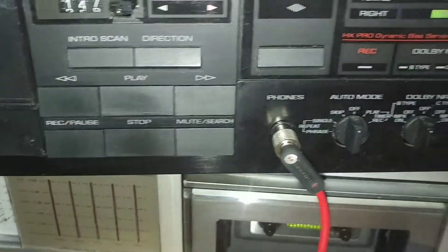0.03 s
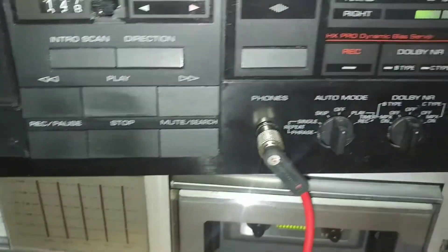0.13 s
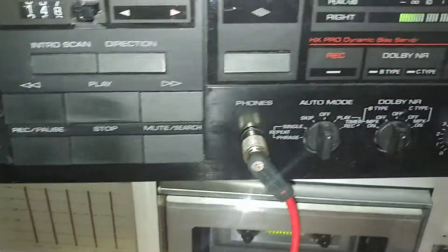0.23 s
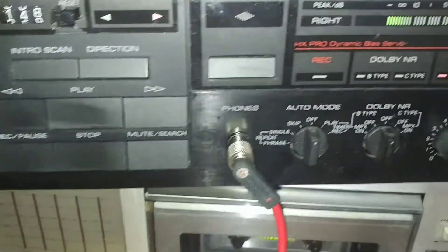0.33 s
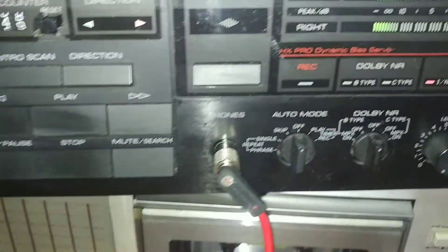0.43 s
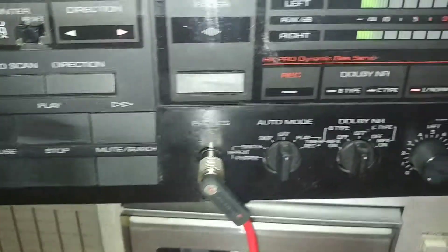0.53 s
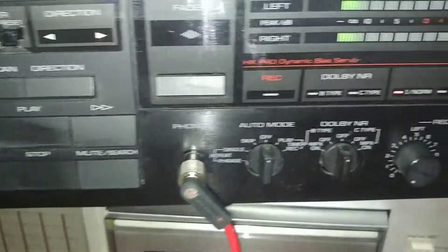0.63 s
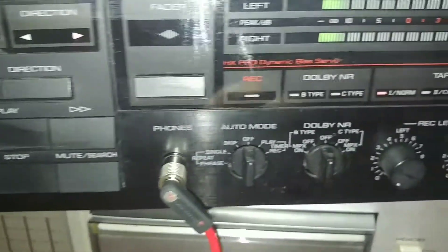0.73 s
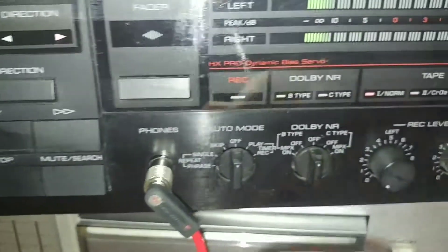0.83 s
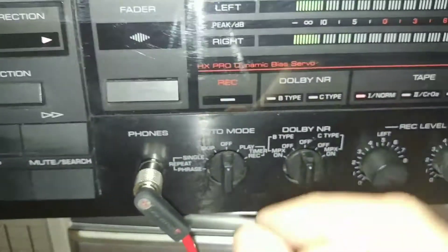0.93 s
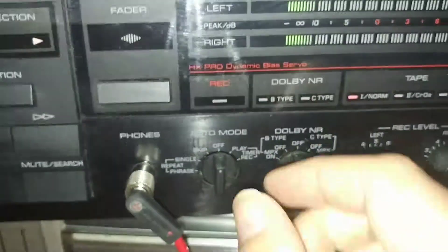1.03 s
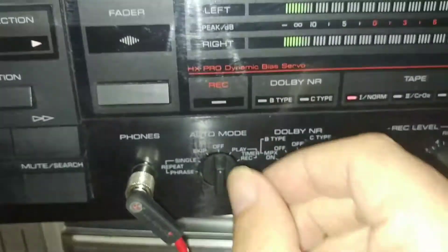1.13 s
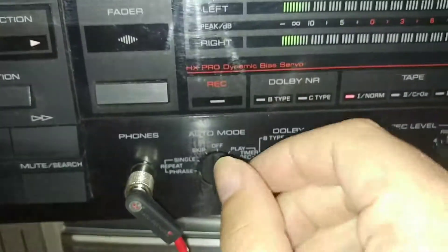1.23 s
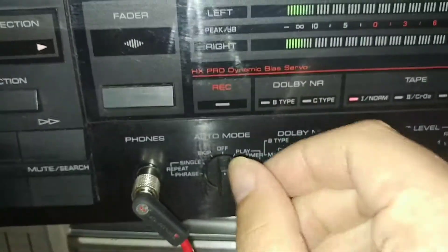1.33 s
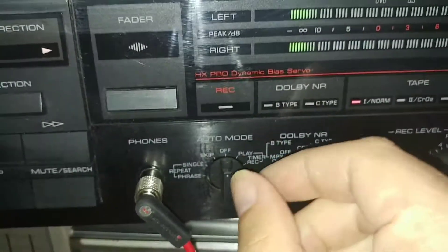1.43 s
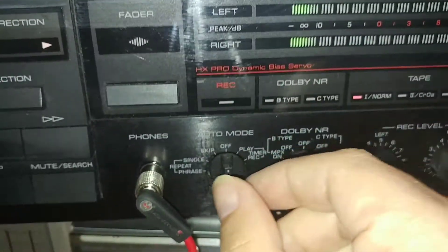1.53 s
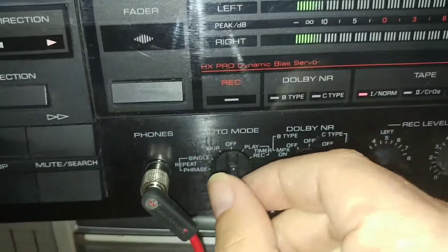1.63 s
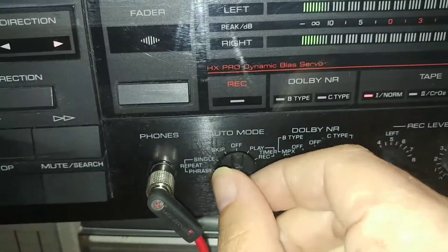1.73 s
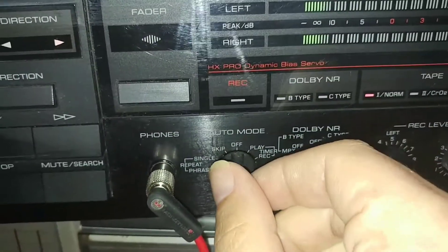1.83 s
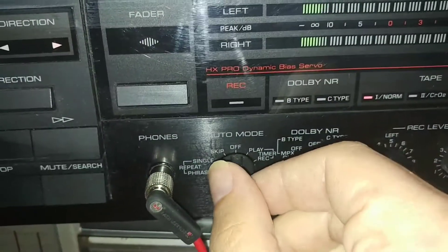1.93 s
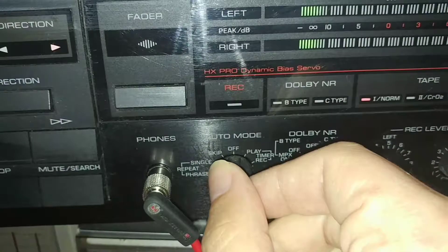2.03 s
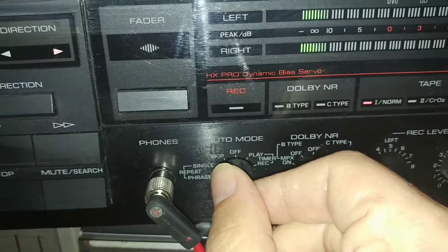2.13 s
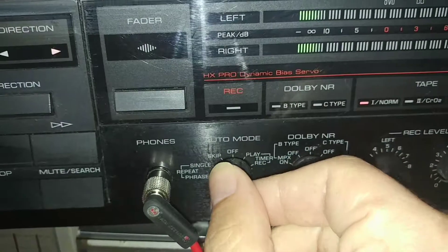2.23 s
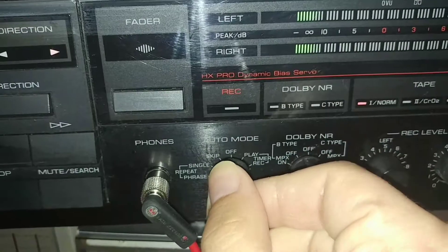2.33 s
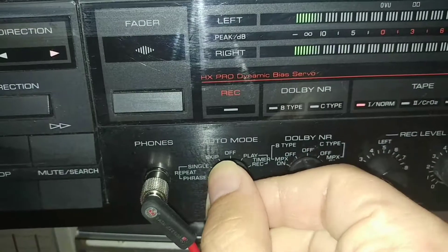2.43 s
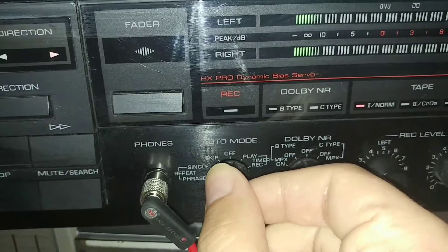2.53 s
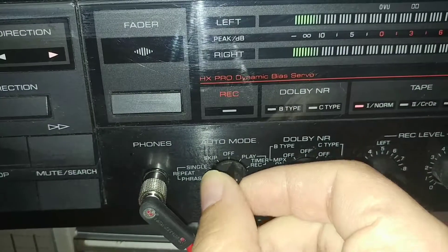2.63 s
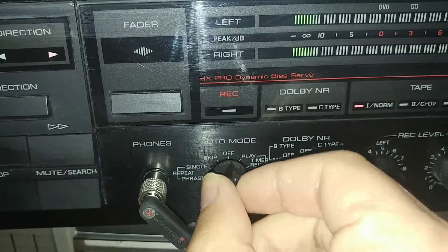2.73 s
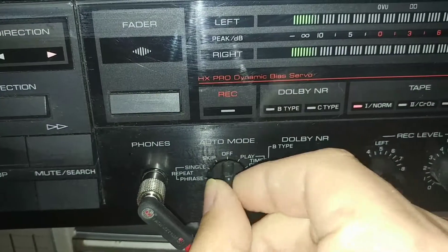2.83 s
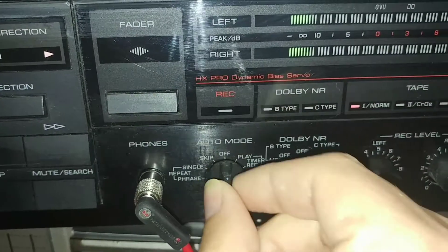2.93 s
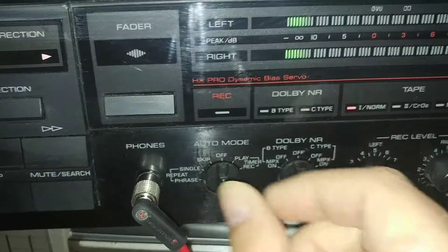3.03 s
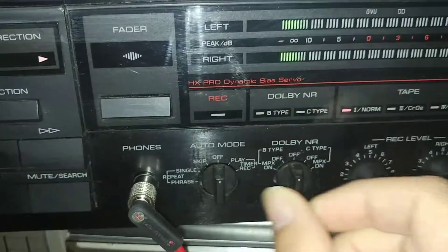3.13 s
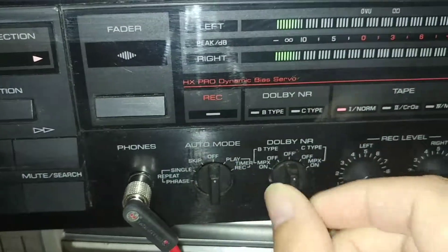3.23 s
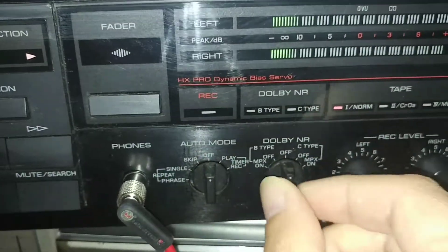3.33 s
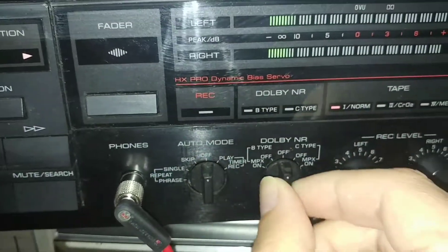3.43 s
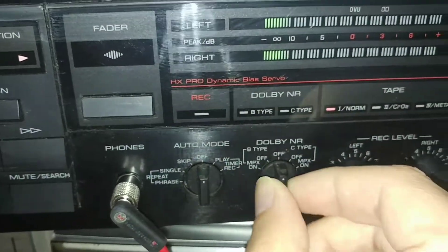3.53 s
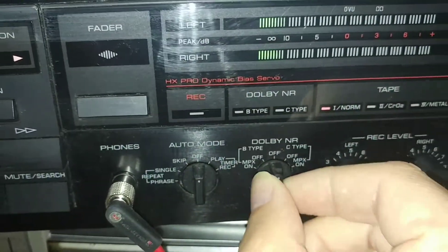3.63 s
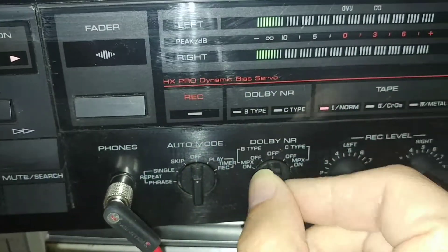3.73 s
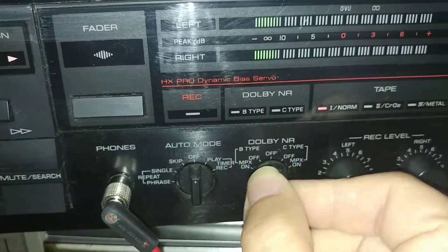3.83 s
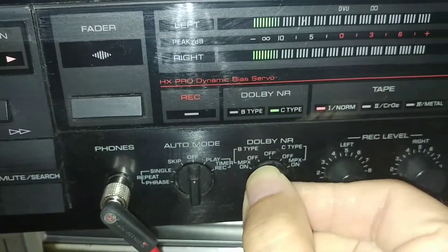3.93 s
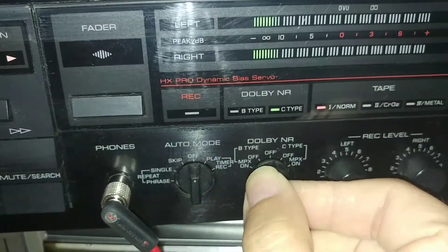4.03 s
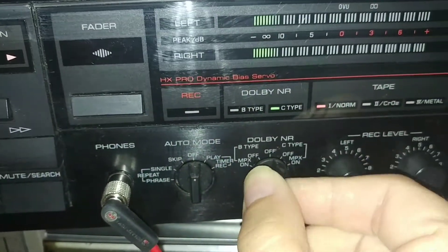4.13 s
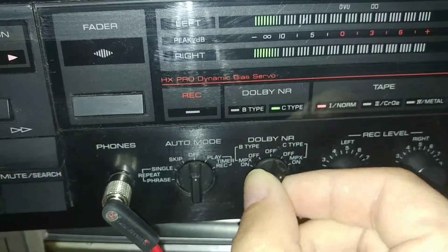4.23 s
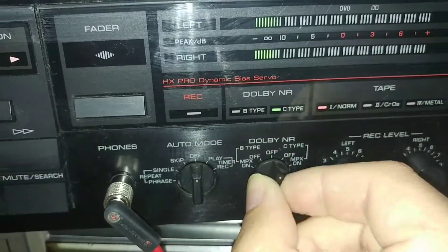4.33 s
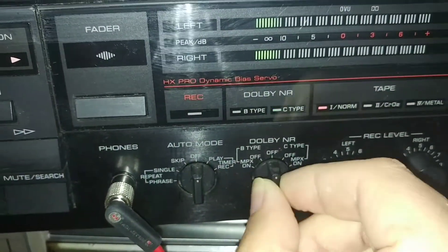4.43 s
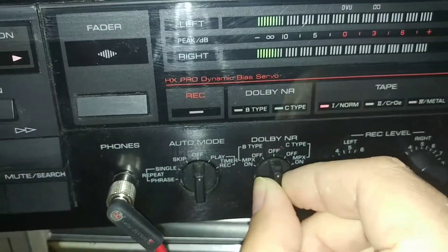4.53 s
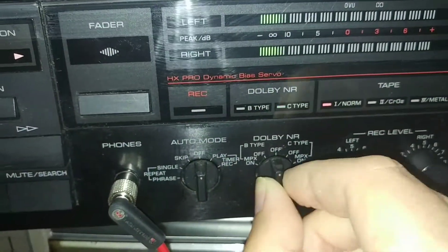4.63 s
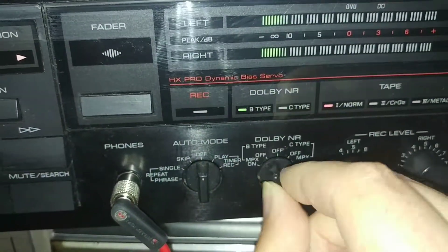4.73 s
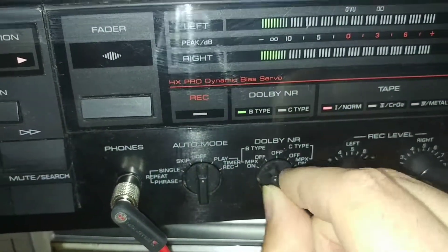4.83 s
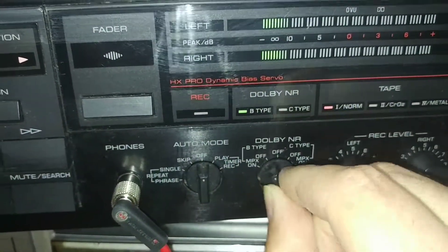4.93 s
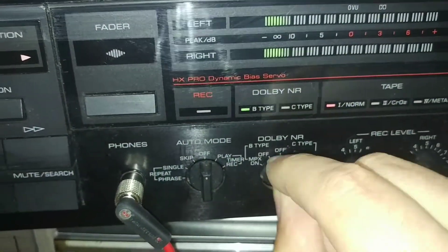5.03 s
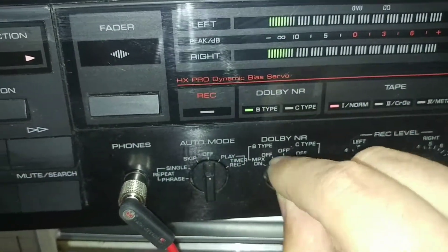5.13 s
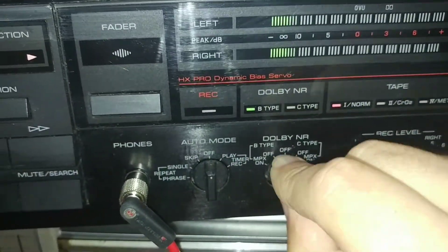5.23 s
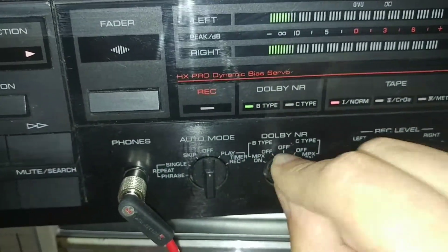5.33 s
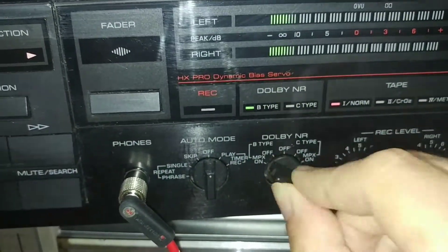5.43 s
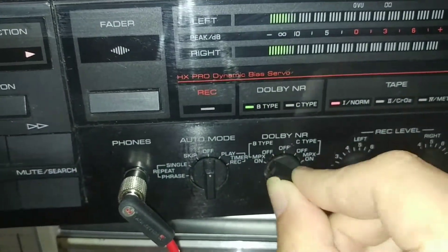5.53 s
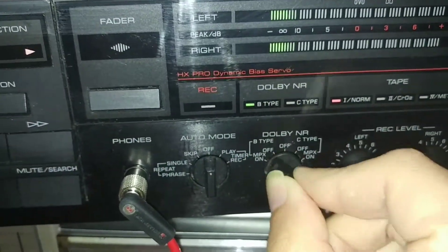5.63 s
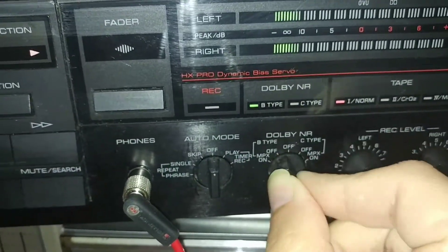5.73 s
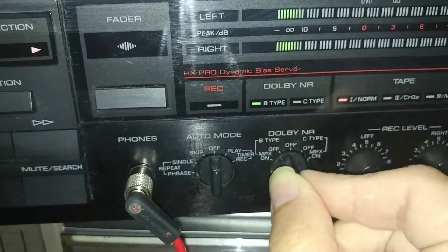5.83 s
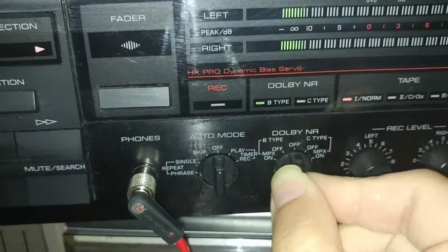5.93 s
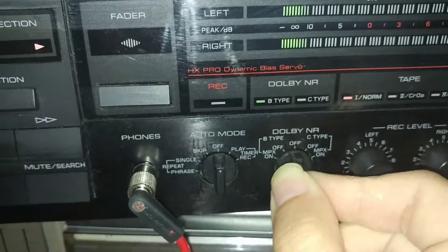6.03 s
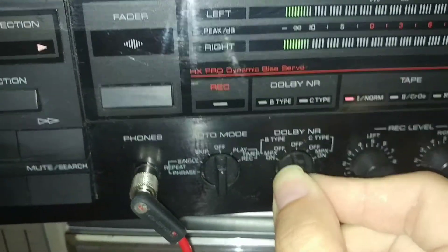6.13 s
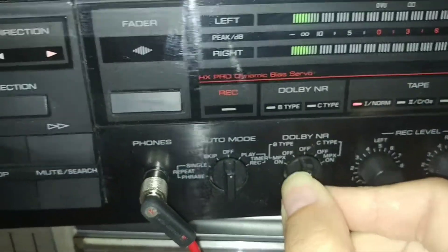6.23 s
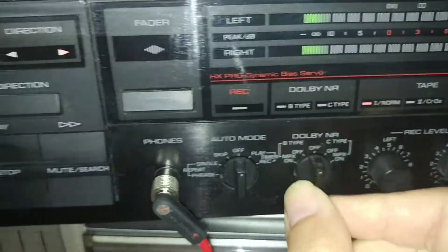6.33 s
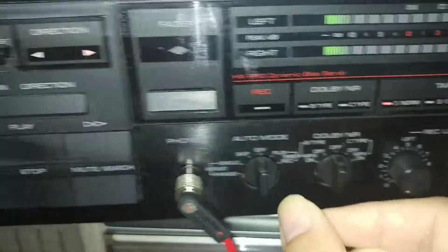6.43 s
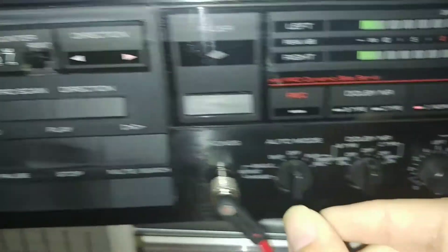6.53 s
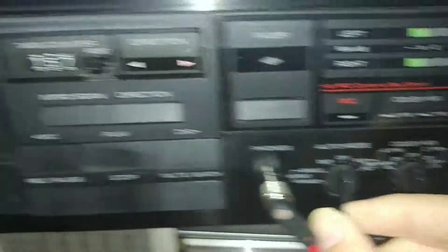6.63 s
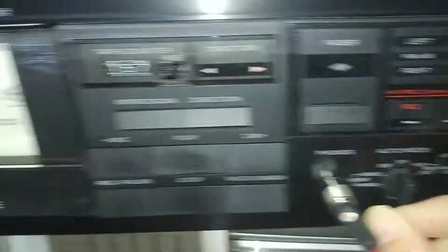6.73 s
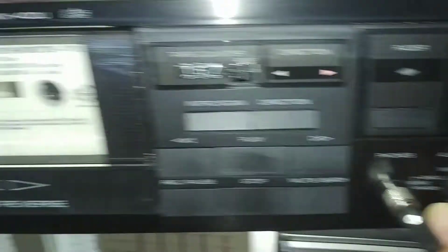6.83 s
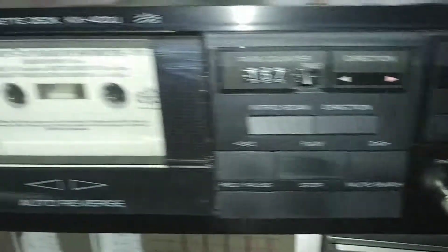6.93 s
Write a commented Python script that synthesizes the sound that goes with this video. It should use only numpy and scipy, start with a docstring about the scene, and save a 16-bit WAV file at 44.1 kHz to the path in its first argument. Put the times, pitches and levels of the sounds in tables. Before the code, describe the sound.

Steady tape motor whir with faint gear ticks, two bursts of loud mechanical clacks, then one booming knock and softer plastic knob clicks

```python
"""A cassette deck plays, very close: its motor whirs and the gears tick until the mechanism clacks to a stop.
The gears spin up again and throw the head carriage over with more clacks, which boom in the cabinet.
Fingers then turn a rotary switch through its detents in a small quiet room, once with a loud clack.
Shaped noise makes the whir, ticks, rubs and blows; dying sines make the modes of cabinet, panel, deck and spring."""
import sys
import numpy as np
from scipy import signal
from scipy.fft import rfft, irfft, next_fast_len
from scipy.io import wavfile
from scipy.ndimage import uniform_filter1d

SR = 44100
rng = np.random.default_rng(int(sys.argv[2]) if len(sys.argv) > 2 else 0)


def file_out(sig):
    """Save sig as 16-bit WAV at sys.argv[1]."""
    # one column per channel
    cols = np.atleast_2d(sig).T
    # limit, then scale
    lim = np.clip(cols, -1, 1)
    pcm = np.round(lim * 32767).astype(np.int16)
    wavfile.write(sys.argv[1], SR, pcm)


N = 308255
TIME = np.arange(N) / SR

# the motor runs twice, to play the tape and to shift the heads: (start s, stop s)
PLAY, SHIFT = (-0.1, 3.42), (3.755, 4.15)

# Colour of the thin hiss. Each row: frequency in Hz, density in dB per Hz.
HISS = [(1500, -3), (4000, -5.5), (6800, 0.5), (8900, -6.5), (10500, 8.5), (13000, -0.5), (15700, 3.5)]
# Modes of the front panel under the switch. Each row: frequency in Hz, level in dB, t60 in s.
PANEL_MODES = [(246, -14.5, 1), (337, 1, 0.35), (538, -15.5, 0.37), (645, -29, 0.75), (846, -7, 0.28),
               (855, -6, 0.087), (1054, -14.5, 0.27), (1370, -1, 0.16), (1464, -5, 0.16),
               (1710, -6.5, 0.071), (1880, -12, 0.25), (1990, -5, 0.093), (2140, -10.5, 0.11)]


def gain_of(db):
    """Decibels to gain."""
    return 10 ** (np.asarray(db) / 20)


def evened(x):
    """Scales to rms 1."""
    return x / np.sqrt(np.mean(x ** 2) + 1e-30)


def read(points, hz):
    """Reads a curve on a log-frequency axis."""
    f, value = np.transpose(points)
    return np.interp(np.log(hz + 1), np.log(f + 1), value)


def level(curve):
    """Gain over time from rows of (s, dB)."""
    return gain_of(np.interp(TIME, *np.transpose(curve)))


def swells(rows):
    """Gain over time from arches of (start s, length s, dB)."""
    total = np.zeros(N)
    for s, length_s, db in rows:
        total += gain_of(db) * np.sin(np.pi * np.clip((TIME - s) / length_s, 0, 1))
    return total


def add(mix, s, sound):
    """Adds a sound to both ports at time s."""
    part = mix[:, max(round(s * SR), 0):][:, :sound.shape[1]]
    part += sound[:, :part.shape[1]]


def complex_noise(*shape):
    """Random complex spectrum."""
    return rng.standard_normal(shape) + 1j * rng.standard_normal(shape)


def noise(colour, size=N, low_hz=20, high_hz=20000):
    """Coloured noise at both ports, partly alike, of joint rms 1."""
    # Likeness of the two ports. Each row: frequency in Hz, share in common from 0 to 1.
    likeness = [(60, 1), (300, 0.98), (700, 0.65), (1500, 0.18), (5000, 0.082), (15000, 0.18)]
    n = next_fast_len(size)
    hz = np.fft.rfftfreq(n, 1 / SR)
    left, other = complex_noise(2, len(hz))
    same = np.clip(read(likeness, hz), 0, 1)
    right = same * left + np.sqrt(1 - same ** 2) * other
    shape = gain_of(read(colour, hz)) * (hz > low_hz) * (hz < high_hz)
    return evened(irfft(np.array([left, right]) * shape, n)[:, :size])


def ragged(colour, depth_db, count=460):
    """Many small parts add close, random peaks to the spectrum above 900 Hz."""
    hz = np.geomspace(40, 17000, count)
    peaks = np.clip(rng.standard_normal(count), -2, 2)
    return np.c_[hz, read(colour, hz) + depth_db * (hz > 900) * peaks]


def drift(rate_hz):
    """Random wander of rms 1, with a Gaussian roll-off at rate_hz."""
    hz = np.fft.rfftfreq(2 * N, 1 / SR)[:4000]
    slow = irfft(complex_noise(len(hz)) * np.exp(-(hz / rate_hz) ** 2))
    return evened(np.interp(TIME, np.linspace(0, 2 * N / SR, len(slow)), slow))


def dying(t, t60):
    """Decay that starts at t = 0."""
    return (t >= 0) * gain_of(-60 * np.maximum(t, 0) / t60)


def mode(hz, t60, t):
    """One dying sine with a soft onset and random phase, alike at both ports."""
    onset = 1 - np.exp(-t / 0.0012)
    return dying(t, t60) * onset * np.sin(2 * np.pi * (hz * t[None] + rng.random()))


def struck(pushes, modes):
    """Sets off a body's modes at each push of (s, dB)."""
    out = np.zeros((2, N))
    for s, force_db in pushes:
        add(out, s, sum(gain_of(force_db + db) * mode(hz, t60, TIME[:SR // 2]) for hz, db, t60 in modes))
    return out


def resonate(x, peaks):
    """Passes a sound through parallel resonances, each twice for dark valleys; rms 1."""
    total = np.zeros_like(x)
    for hz, width_hz, db in peaks:
        section = np.concatenate(signal.iirpeak(hz, hz / width_hz, SR))
        total += gain_of(db) * signal.sosfilt([section] * 2, x)
    return evened(total)


def throb(hz, depth, wander=0.008):
    """Once a turn a rotating part rubs harder."""
    turns = np.cumsum(hz * (1 + wander * drift(5.4))) / SR
    return evened(np.exp(depth * np.cos(2 * np.pi * turns)))


def running(start, stop, spin_up_s=0.0098, coast_t60=0.4):
    """Gain of something that starts quickly, holds and coasts to rest."""
    return np.clip((TIME - start) / spin_up_s, 0, 1) * dying(np.maximum(TIME - stop, 0), coast_t60)


def load(full_s=2.9, build_s=0.5, slack_db=-12):
    """Gain of the parts that sing when the gears bear load: lower while slack, full from full_s."""
    return gain_of(slack_db * np.clip((full_s - TIME) / build_s, 0, 1))


def playing():
    """Gain of the playing motor, with its nearness."""
    # Nearness of the transport. Each row: time in s, gain in dB.
    nearness = [(0, 2), (.7, 0.1), (1.6, -.5), (3.3, 0.5)]
    return running(*PLAY) * level(nearness)


def whir(play, level_db=-56, motor_hz=52.6, flywheel_hz=6.5, shift_db=-10):
    """The motor shakes the transport's resonances, swelling with the flywheel."""
    # Transport resonances. Each row: frequency in Hz, width in Hz, level in dB.
    transport = [(399, 65, -2), (458, 20, -5.5), (806, 63, 0), (850.4, 27, 0.5), (1125, 44, -5.5),
                 (1233, 110, -4), (1458, 50, -8.5), (1653, 63, -9.5), (1948, 410, -19), (2230, 26, -11.5),
                 (2454, 78, -15)]
    shake = noise([(100, 0.00065), (3000, 0)], high_hz=4000)
    shake = shake * throb(motor_hz, depth=0.48) * throb(flywheel_hz, depth=0.24)
    runs = play + gain_of(shift_db) * running(*SHIFT)
    return gain_of(level_db) * resonate(shake, transport) * runs


def whine(play, level_db=-58, whine_hz=394, throb_hz=5.8):
    """A gear whines: a wandering, throbbing sine that grows with load."""
    turns = np.cumsum(whine_hz * (1 + 0.006 * drift(5.56))) / SR
    tone = np.sin(2 * np.pi * turns) * gain_of(0.9 * drift(5)) * throb(throb_hz, depth=0.51)
    return gain_of(level_db) * evened(tone) * play * load()


def tape(play, level_db=-58.5, reel_hz=58.7, shift_db=4.5):
    """Tape slides over the heads: unsteady hiss that throbs with the reel."""
    # Colour of the sliding tape. Each row: frequency in Hz, density in dB per Hz.
    sliding = [(200, 8), (600, 9), (1000, 2), (2300, 2), (3400, -2), (5000, -1.5), (7400, -1.5),
               (8800, -12), (10000, 5.5), (10800, 4.5), (11800, 2), (14000, 4.5), (15700, 4.5)]
    rub = noise(ragged(sliding, depth_db=2.5)) * throb(reel_hz, depth=0.18) * gain_of(2.4 * drift(59))
    return gain_of(level_db) * rub * (play + gain_of(shift_db) * running(*SHIFT))


def motor(hiss_db=-61.5):
    """The running motor: whir of the transport, whine of a gear, tape slide and thin hiss."""
    play = playing()
    return whir(play) + whine(play) + tape(play) + gain_of(hiss_db) * play * noise(HISS)


def room(air_db=-64, hiss_db=-66, hum_spread_db=4):
    """Low room noise, a wavering hum and thin hiss."""
    # Colour of the room noise. Each row: frequency in Hz, density in dB per Hz.
    air = [(18, -58), (30, -37.5), (64, -6.5), (173, -4.5), (206, -10), (240, 2.5), (280, -18),
           (321, -13.5), (510, -14.5), (606, -16.5), (3000, -37.5), (3900, -94), (6600, -120)]
    # Hum partials. Each row: frequency in Hz, level in dB.
    partials = [(75, -72.5), (118, -75), (240, -69)]
    out = gain_of(air_db) * noise(air) + gain_of(hiss_db) * noise(HISS)
    for hz, db in partials:
        tone = np.sin(2 * np.pi * hz * TIME + 1.1 * drift(6))
        out += gain_of(db) * evened(tone * gain_of(hum_spread_db * drift(7.9)))
    return out


def passing_teeth(tooth_hz=29.6, tooth_db=-59.5, spread_db=2.5):
    """Power of the faint, uneven ticks, one for each tooth that passes while playing."""
    passing = np.diff(np.floor(tooth_hz * TIME), prepend=0)
    uneven_db = tooth_db + spread_db * np.clip(rng.standard_normal(N), -2, 2)
    return passing * (running(*PLAY) * gain_of(uneven_db)) ** 2


def rattling_teeth(ring, teeth_per_s=700, spread=0.34, mesh_db=-64):
    """Power of many random catches in a row as the gears spin up and shift the heads."""
    # Bursts of rattling. Each row: start in s, length in s, relative level in dB.
    bursts = [(3.757, 0.05, -47.5), (3.808, 0.031, -43.5), (3.838, .022, -42.5), (3.913, .02, -46.5),
              (4.0, .04, -48.5), (4.085, 0.035, -44)]
    teeth = (rng.random(N) < teeth_per_s / SR) * np.exp(spread * rng.standard_normal(N))
    drive = swells(bursts) ** 2 + (gain_of(mesh_db) * running(*SHIFT)) ** 2
    return teeth / teeth.mean() / ring.sum() * drive


def gear_train(level_db=-56):
    """The spinning train sings through its resonances while the heads shift."""
    # Train resonances. Each row: frequency in Hz, width in Hz, level in dB.
    train = [(552, 18, -1.5), (862, 42, 1.5), (1388, 50, 2), (1894, 150, -4.5)]
    return gain_of(level_db) * running(*SHIFT) * resonate(noise([(100, 0), (5000, 0.0029)]), train)


def gears(t60=0.026, room_t60=0.2, room_db=-18, wheel_db=-12):
    """Catching teeth set off short noise bursts with a room tail, which ring the wheel; the train sings."""
    # Teeth that catch hard. Each row: time in s, relative peak in dB.
    ticks = [(.0498, -41.5), (.227, -49), (.478, -47.5), (.494, -40.5), (1.9835, -45), (2.2208, -44.5),
             (2.389, -47.5), (2.4255, -44.5), (2.4598, -45), (2.562, -46), (2.5951, -45.5), (2.7332, -47),
             (2.908, -45.5), (3.0423, -40.5), (3.0803, -39.5), (3.218, -44.5), (3.2586, -39),
             (3.2764, -31.5), (3.4773, -44), (3.7596, -39), (4.0008, -43), (4.0707, -44), (4.0946, -42.5)]
    # Gear colour. Each row: frequency in Hz, density in dB per Hz.
    colour = [(200, -20.5), (900, -5.5), (1900, -6.5), (3000, -9.5), (4000, -6.5), (4450, -1.5),
              (4900, -10.5), (5800, -4), (7300, 2), (8900, -11), (10700, 9), (11800, -5), (16000, -2.5)]
    # Resonances of a struck gear. Each row: frequency in Hz, width in Hz, level in dB.
    wheel_peaks = [(4435, 210, 2.5), (5810, 380, -8.5), (7400, 540, -15.5)]
    t = np.arange(SR // 4) / SR
    decay = dying(t, t60) ** 2 + (gain_of(room_db) * dying(t, room_t60)) ** 2
    ring = decay * (1 - np.exp(-t / 0.0005))
    catches = passing_teeth()
    for s, db in ticks:
        catches[round(s * SR)] = gain_of(db) ** 2
    catches += rattling_teeth(ring)
    envelope = np.sqrt(abs(signal.fftconvolve(catches, ring)[:N]))  # powers add
    ticking = gain_of(6.0) * envelope * noise(ragged(colour, depth_db=7.5))
    wheel = gain_of(wheel_db) * ticking.std() * resonate(ticking, wheel_peaks) * load()
    return ticking + wheel + gear_train()


def rubs(grip_db=-67, grip_spread_db=2.5):
    """Fingers bump and rub on the panel in soft, dull swells that ring it.

    From 3.5 s on, a faint unsteady rub lies underneath, which dies away after 6.95 s."""
    # Bumps and rubs. Each row: start in s, length in s, relative level in dB.
    bumps = [(1.197, .12, -54), (2.638, 0.22, -53.5), (2.922, .22, -45), (3.198, 0.3, -44.5),
             (3.76, 0.053, -56), (4.466, 0.088, -49.5), (4.512, 0.15, -42.5), (4.89, 0.094, -46.5),
             (5.275, 0.058, -54), (5.59, 0.14, -63.5), (6.26, 0.16, -52.5), (6.765, 0.15, -58)]
    # Colour of a rub. Each row: frequency in Hz, density in dB per Hz.
    colour = [(50, -25), (130, 2.5), (270, -1), (380, -6.5), (560, -0.5), (1000, -18), (2000, -18.5),
              (3500, -32.5), (16000, -32)]
    rub = noise(colour) * gain_of(2.0 * drift(28))
    ringing = resonate(rub, [(hz, 50, db) for hz, db, t60 in PANEL_MODES])  # 50 Hz wide
    grip = gain_of(grip_db + grip_spread_db * drift(6.1)) * running(3.5, 6.95)
    return (swells(bumps) + grip) * (0.67 * rub + 0.36 * ringing)


def clacks():
    """Loud, bright blows of the deck's mechanism and, at 4.718 s, of the switch, booming in the cabinet's modes."""
    # Each row: time in s, chatter in s, relative strength in dB, brightness in dB, extra body knock in dB.
    rows = [(2.4746, 0.002, -47, 6.5, 2.5), (3.2802, .0013, -26.5, 12.5, -8.5),
            (3.2837, 0.0056, -25, 12.5, 4), (3.3027, 0.01, -32.5, 4.5, 1), (3.4824, .0035, -36, 12, -3),
            (4.111, .012, -27.5, 2, -0.5), (4.117, 0.0031, -26.5, 13.5, 2.5), (4.129, .009, -28, 0, 1.5),
            (4.147, 0.0019, -29.5, 17.5, -8), (4.2013, 0.0059, -25.5, 8, 0),
            (4.718, 0.0035, -22.5, 4.5, -0.5)]
    # Metal colour. Each row: frequency in Hz, density in dB per Hz.
    metal = [(50, -18.5), (150, -6.5), (300, 3), (550, -2.5), (900, -1.5), (1400, -3), (2100, -6.5),
             (3300, -13.5), (4700, -12), (7000, -6.5), (8800, -14.5), (10400, 2.5), (12200, -3),
             (16000, -10)]
    # Thud, knock, snap and tick of an even blow, in dB.
    bands_db = (-0.31, 0.32, .3, 0.24)
    # Cabinet modes. Each row: frequency in Hz, level in dB, t60 in s.
    cabinet = [(156.6, -11, 0.64), (254.5, -1.5, 0.39), (307, -15, 0.098), (348.4, -8.5, 0.55),
               (407, -8, 0.28), (436, -19, 0.14), (526, -8, 0.28), (644, -19, 0.13), (702, -14.5, 0.36),
               (878.6, -5.5, 0.24), (1100, -17.5, 0.099), (1125, -11, 0.28), (1227, -7, 0.17),
               (1640, -18, .2), (1813, -7, 0.17), (1990, -28.5, 0.45), (2090, -10, 0.13)]
    out = np.zeros((2, N))
    colour = ragged(metal, depth_db=5.0)
    for row in rows:
        s, sound = blow(row, colour, bands_db, cabinet, modes_db=2.0, shadow_db=0.0)
        add(out, s, gain_of(-3.0) * sound)
    return out


def blow(row, colour, bands_db, modes, modes_db, shadow_db, crack_db=3, crack_t60=0.0013, count=4):
    """Parts meet and chatter: each contact cracks and rings briefly, the room and case for longer."""
    # How thud, knock, snap and tick ring. Each row: low edge in Hz, high edge in Hz, rise in s,
    # contact t60 in s, room level in dB, room t60 in s.
    rings = [(40.7, 450, 0.0079, 0.064, -3, 0.38), (433, 2600, 0.0027, 0.14, -4.5, 0.29),
             (2546, 8800, 0.00078, 0.078, -8.5, 0.26), (9100, 16000, 0.00033, 0.047, -11.5, 0.19)]
    # A harder contact tilts a blow upwards: share of the brightness for thud, knock, snap and tick.
    tilt = (-1.02, -0.29, 0.38, 1)
    s, chatter_s, strength_db, bright_db, body_db = row
    band_db = strength_db + np.array(bands_db) + bright_db * np.array(tilt) + np.array([0, body_db, 0, 0])
    t = np.arange(SR * 3 // 4) / SR
    steps = np.arange(1, count) + rng.uniform(-0.3, 0.3, count - 1)
    contacts = chatter_s * np.r_[0, steps / (count - 1)]
    cracks = sum(gain_of(crack_db) ** 2 * dying(t - c, crack_t60) ** 2 for c in contacts)
    out = np.zeros((2, len(t)))
    for db, (low, high, rise, t60, room_db, room_t60) in zip(band_db, rings):
        near = sum(dying(t - c, t60) ** 2 for c in contacts)
        near = near / near.max() + cracks * (low > 1000)  # only the treble cracks
        near = near * (1 - np.exp(-t / rise)) ** 2
        tail = (gain_of(room_db) * dying(t, room_t60) * (1 - np.exp(-t / (rise + 0.0044)))) ** 2
        power = near * gain_of([[0], [2 * shadow_db]]) + tail  # shadow_db: direct sound at the far port
        envelope = np.sqrt(power / uniform_filter1d(power[0], size=200).max())
        out += gain_of(db) * envelope * noise(colour, len(t), low, high)
    thud_top_hz = rings[0][1]
    for hz, db, t60 in modes:  # the thud drives the low modes, the knock the others
        force_db = band_db[int(hz > thud_top_hz)] + modes_db + 1.2 * rng.standard_normal()
        out += gain_of(force_db + db) * mode(hz, t60, t)
    return s, out


def grinding():
    """The switch shaft grinds just before it gives: rough noise."""
    # Each row: start in s, length in s, level in dB.
    grinds = [(2.955, 0.036, -51), (4.008, 0.047, -45.5), (4.698, 0.023, -34), (5.31, 0.16, -70),
              (5.95, 0.15, -74.5)]
    colour = [(200, 1.5), (900, 3), (2100, 5.5), (3500, -10), (6000, -14), (9000, -32), (10500, -7), (16000, -16)]
    return swells(grinds) * noise(colour) * gain_of(drift(200))


def spring():
    """A return spring twangs as the mechanism lets go: three high dying modes."""
    # Each row: time in s, force in dB.
    twangs = [(3.286, -39.5), (3.484, -45)]
    # Each row: frequency in Hz, level in dB, t60 in s.
    modes = [(6800, -5.5, 0.26), (7100, -3.5, .3), (7800, -2, 0.2)]
    return struck(twangs, modes)


def switch_clicks():
    """Plastic blows of the rotary switch's detents, which ring the front panel."""
    # Each row: time in s, chatter in s, relative strength in dB, brightness in dB, extra body knock in dB.
    detents = [(4.461, 0.00088, -51.5, 1, -4.5), (4.536, 0.0029, -41.5, 2.5, -2),
               (4.5668, 0.00075, -39, 4, -2), (4.579, .006, -49, -2, 4), (4.665, .001, -49.5, 8, -5),
               (4.8787, 0.003, -40.5, 1.5, -1), (5.1871, 0.0027, -41.5, 3, 0),
               (5.8199, 0.0011, -39.5, 5, 4), (6.0988, .003, -38.5, 3, 3.5)]
    # Plastic colour. Each row: frequency in Hz, density in dB per Hz.
    plastic = [(50, -32), (150, 2), (330, 5), (650, -6), (900, -0.5), (1400, -6.5), (2050, -8.5),
               (3000, -19), (5500, -19), (8700, -20.5), (10500, -0.5), (13000, -13), (16000, -8)]
    # Thud, knock, snap and tick of an even blow, in dB.
    bands_db = (-0.1, 1.5, -4, 3)
    out = np.zeros((2, N))
    colour = ragged(plastic, depth_db=1.0)
    for row in detents:
        s, sound = blow(row, colour, bands_db, PANEL_MODES, modes_db=5.0, shadow_db=-1.0)
        add(out, s, gain_of(-4.0) * sound)
    return out


def deck_booms():
    """A firm turn of the switch rocks the whole deck: low dying modes."""
    # Each row: time in s, force in dB.
    booms = [(4.476, -40.5), (4.55, -39.5), (4.579, -36), (4.719, -18), (4.882, -38)]
    # Each row: frequency in Hz, level in dB, t60 in s.
    modes = [(215, -13, 0.18), (261.3, 0.5, 0.23), (308, -4.5, 0.12), (427, -8.5, 0.19)]
    return struck(booms, modes)


def hiss_swells():
    """The thin hiss swells and sinks: arches of hiss."""
    # Each row: start in s, length in s, level in dB.
    arches = [(4.5, .75, -61), (6.0, .6, -65), (6.72, 0.28, -60)]
    return swells(arches) * noise(HISS)


def scene():
    """The deck, the fingers on its switch and the quiet room."""
    deck = motor() + gears() + clacks() + spring() + deck_booms()
    hand = rubs() + grinding() + switch_clicks()
    return deck + hand + room() + hiss_swells()


def record(dry, edge_hz=16100):
    """The right port faces away: it hears later and loses the top treble; then the band limit."""
    # Response of the right port. Each row: frequency in Hz, gain in dB.
    far_port = [(100, -3), (300, -0.5), (700, -2), (1500, -8.5), (3000, -0.5), (7500, 0), (8600, -3.5),
                (9500, -26), (16000, -13)]
    # Lag of the right port. Each row: frequency in Hz, lag in s.
    lag = [(100, 0.00024), (600, 0.00027), (1000, 0.00012), (1300, 0.00037), (16000, .00036)]
    n = next_fast_len(N + 4096)
    hz = np.fft.rfftfreq(n, 1 / SR)
    port = gain_of(read(far_port, hz)) * np.exp(-2j * np.pi * hz * read(lag, hz))
    right = irfft(rfft(dry[1], n) * port, n)[:N]
    lowpass = signal.firwin(255, edge_hz, window=("kaiser", 8), fs=SR)
    return signal.oaconvolve(np.array([dry[0], right]), lowpass[None], "same")


dry = scene()
out = record(dry)
file_out(out)
```